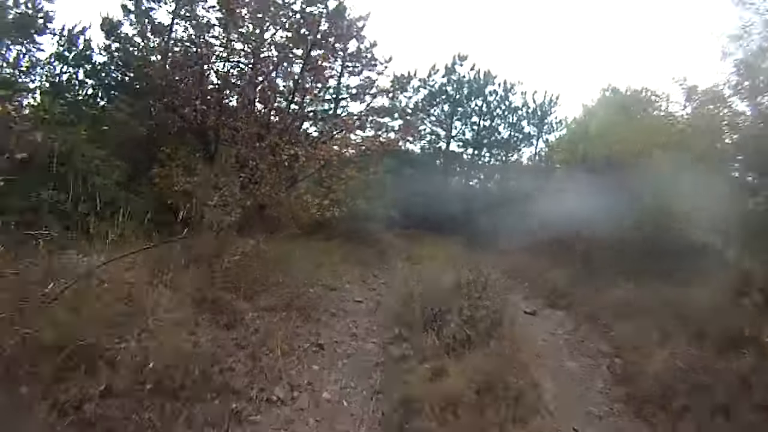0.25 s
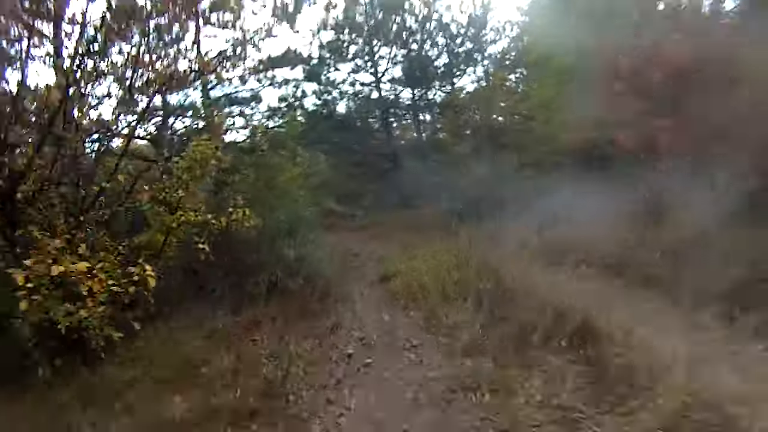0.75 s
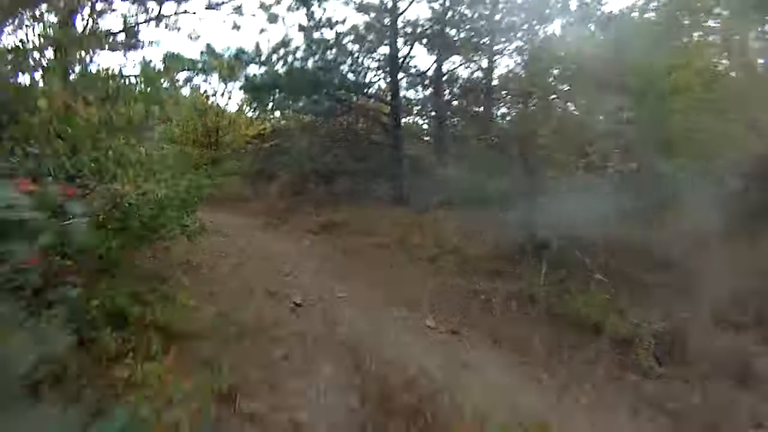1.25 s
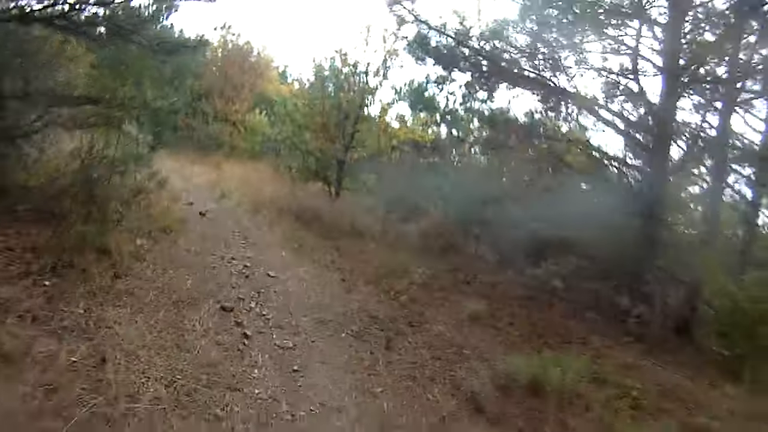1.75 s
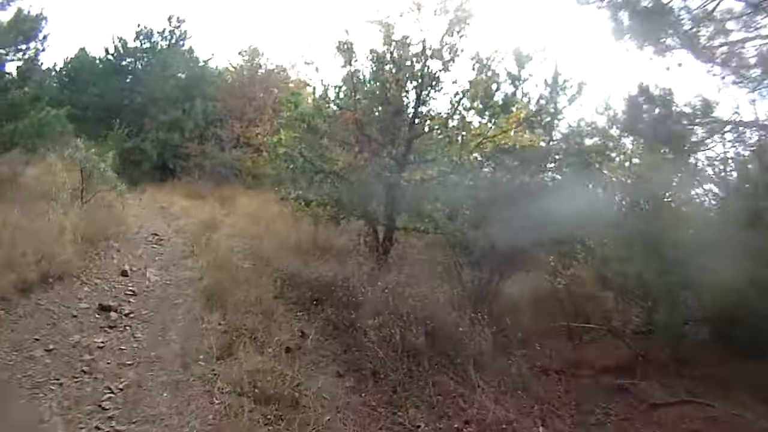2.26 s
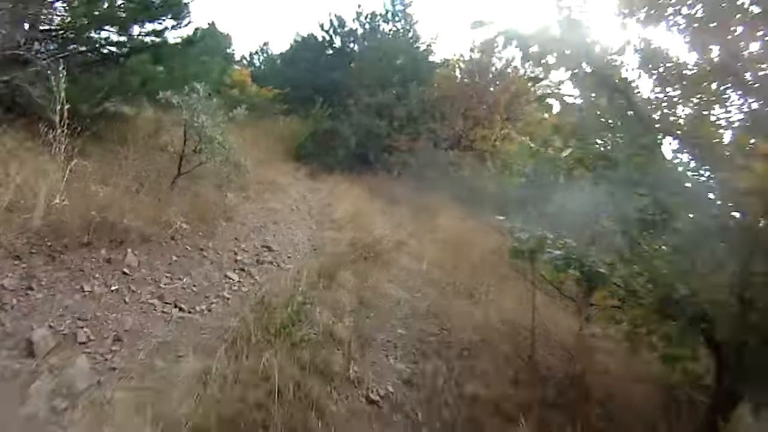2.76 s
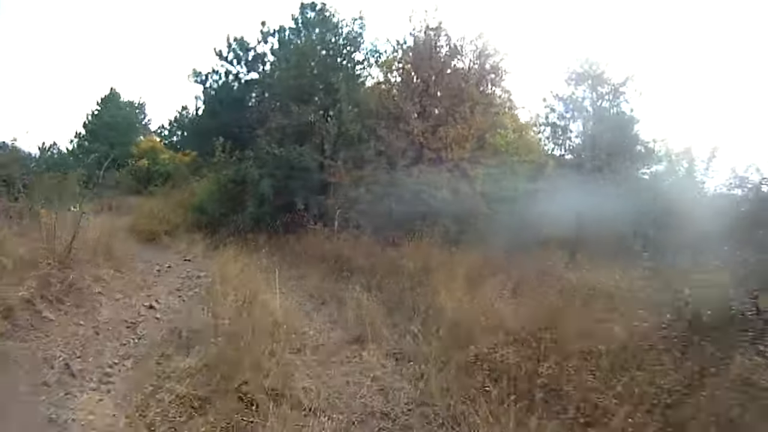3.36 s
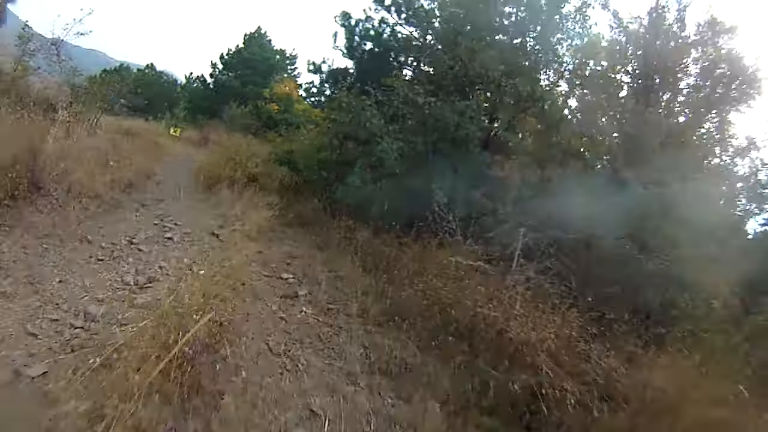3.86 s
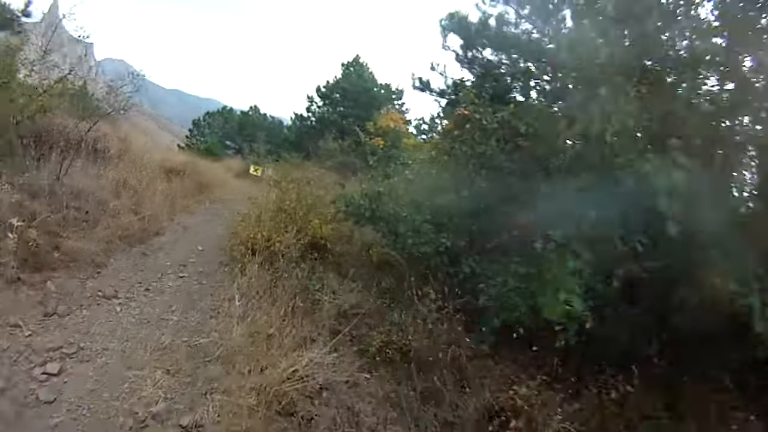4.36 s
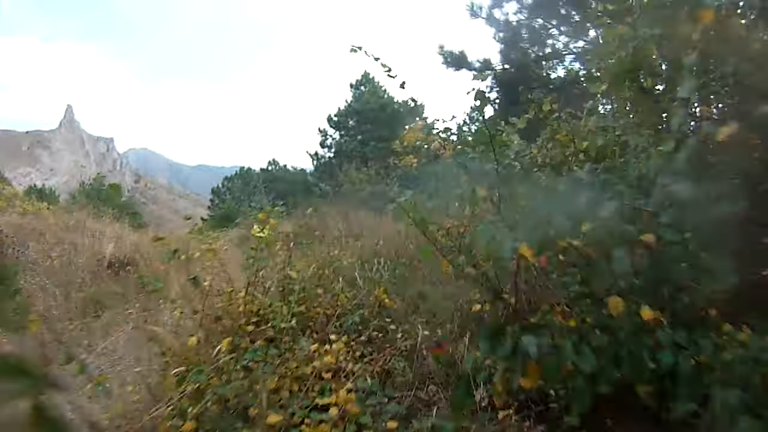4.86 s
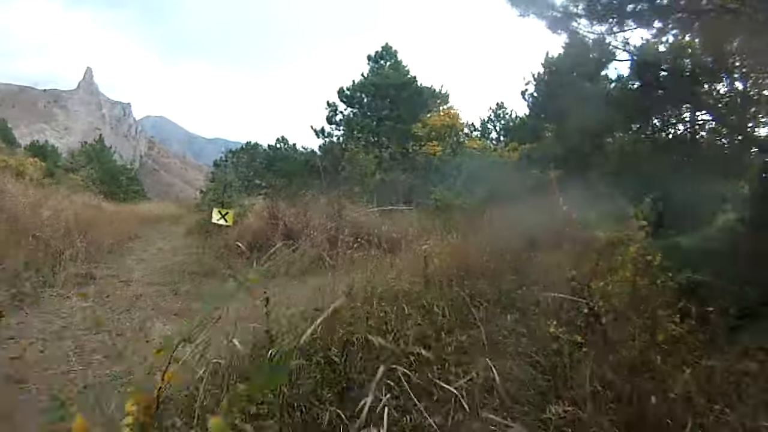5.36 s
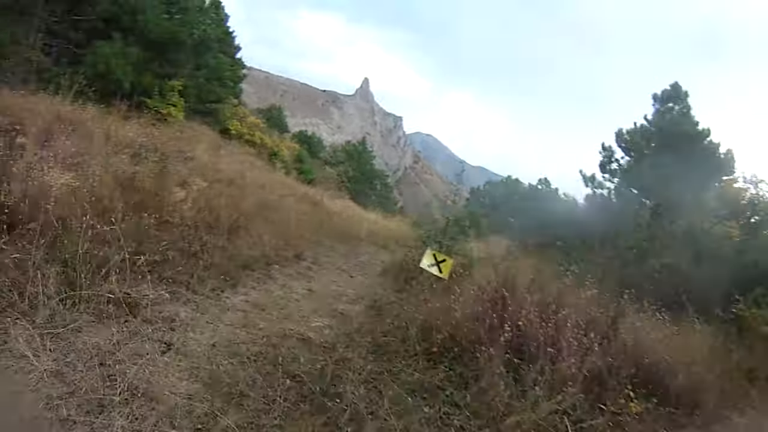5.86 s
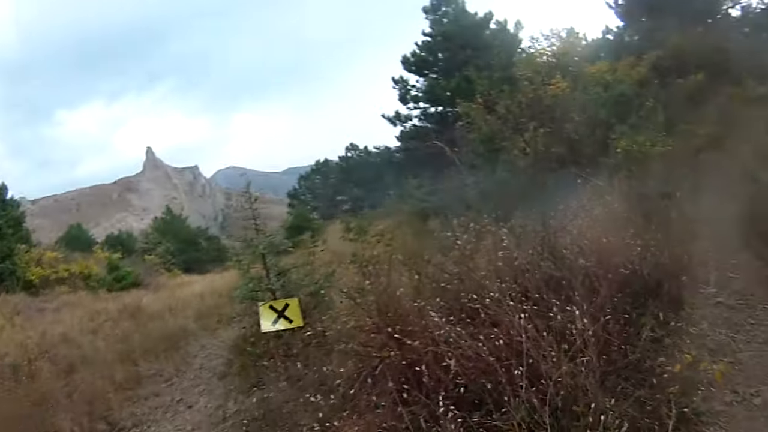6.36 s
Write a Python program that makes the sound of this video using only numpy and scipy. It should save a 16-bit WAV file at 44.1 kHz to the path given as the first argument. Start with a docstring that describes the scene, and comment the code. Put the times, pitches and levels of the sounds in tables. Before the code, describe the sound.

Bicycle disc brakes honk and shriek in rough, stuttering pulls while tyres rumble and crunch over a rocky trail, with rattling and wind.

```python
"""A mountain bike rolls down a rocky trail, heard from an action camera in a closed case on the bike.
From the start tyres rumble, wind buffets the case, gravel crunches and stones make the mount rattle.
At 1.3, 3.6 and 4.4 s the disc brake is pulled: stick-slip of the pads gives a rough horn-like honk.
In short bursts a rotor mode locks on, shrieks on harmonic 6, feeds the octave and drags the pitch down.
The rattle thins as the bike slows; from 6 s the pads rub dry as the brake is let go."""
import sys
import numpy as np
from scipy import signal
from scipy.fft import rfft, irfft
from scipy.io import wavfile
from scipy.ndimage import uniform_filter1d

SR = 44100
rng = np.random.default_rng(int(sys.argv[2]) if len(sys.argv) > 2 else 0)


def master(y):
    """Save y as 16-bit WAV."""
    cut = np.clip(np.atleast_2d(y).T, -1, 1)
    pcm = np.round(cut * 32767)  # scale
    wavfile.write(sys.argv[1], SR, pcm.astype(np.int16))


N = 291501
T = np.arange(N) / SR

# tyre rumble, following ground roughness: t/s, level/dB
RUMBLE_LEVEL = [(0.0, -20), (0.02, -19), (1.25, -19.5), (1.49, -26), (1.54, -20), (1.78, -35),
                (1.86, -29.5), (2.34, -38), (2.43, -27.5), (2.49, -44), (2.59, -29.5), (2.82, -19),
                (3.44, -22), (3.48, -15.5), (3.52, -32), (3.66, -18), (3.7, -38), (3.81, -18.5),
                (3.98, -34.5), (4.08, -29), (4.12, -43), (4.4, -20), (4.57, -29.5), (4.79, -24),
                (4.92, -39), (4.97, -24), (5.12, -36.5), (5.69, -39.5), (6.04, -47.5), (6.11, -41),
                (6.5, -26), (6.61, -42)]
# gravel crunch: t/s, level/dB
GRAVEL_LEVEL = [(0, -32), (.25, -39), (.6, -33.5), (.7, -21.5), (.85, -22.5), (.95, -38), (1.1, -25.5),
                (1.25, -28), (1.6, -25.5), (2.6, -31), (2.85, -35), (3.25, -25.5), (3.45, -33.5),
                (3.51, -45), (3.62, -24.5), (4.3, -32.5), (5.0, -27.5), (5.9, -34), (6.61, -44)]
# case resonances: f/Hz, width/Hz, gain/dB
CASE_MODES = [(257, 62, 5.5), (724, 61, 6), (1000, 95, -2.5), (1755, 148, -2.5), (2567, 230, -4),
              (2847, 210, 0.5), (3540, 375, 2), (3908, 435, -1.5), (5200, 750, -6.5)]
# steady honk over the three pulls: t/s, fundamental/dB, octave/dB
HONK_LEVEL = [(1.32, -58.5, -65), (1.337, -22, -17.5), (1.4, -22, -26.5), (1.47, -23, -19), (1.5, -33, -34),
              (1.53, -25, -18.5), (1.73, -23, -26.5), (1.85, -20.5, -21), (2.1, -22, -27.5),
              (2.28, -25.5, -19), (2.365, -22.5, -30), (2.545, -25.5, -28.5), (2.58, -33, -50),
              (3.6, -44, -39), (3.65, -20.5, -29), (3.79, -24, -25), (3.85, -23, -44), (3.88, -28, -23),
              (4.02, -20.5, -20), (4.15, -31, -20), (4.2, -27.5, -40), (4.37, -24, -39), (4.41, -19.5, -18),
              (4.7, -23, -25.5), (4.85, -31, -29.5), (4.95, -21.5, -23), (5.17, -25, -30),
              (5.27, -23, -17.5), (5.46, -22.5, -26.5), (5.78, -21, -23.5), (6.06, -31.5, -35.5),
              (6.23, -17, -29.5), (6.26, -24, -20), (6.33, -21.5, -20), (6.37, -22, -33), (6.6, -35, -44)]


def undb(db):
    """Decibels to gain."""
    return 10 ** (np.asarray(db) / 20)


def unit(x):
    """Scale to rms 1."""
    return x / np.sqrt(np.mean(x ** 2))


def running_unit(x, samples=2646):
    """Scale to running rms 1."""
    return x / np.sqrt(uniform_filter1d(x ** 2, size=samples))


def curves(rows):
    """Each column after t/s, interpolated over T."""
    times_s, *columns = np.transpose(rows)
    return [np.interp(T, times_s, column) for column in columns]


def noise(colour):
    """Noise of rms 1; colour rows: f/Hz, level/dB."""
    hz, db = np.transpose(colour)
    bins_hz = np.maximum(np.fft.rfftfreq(N, 1 / SR), 1)
    gain_db = np.interp(np.log(bins_hz), np.log(hz), db, left=-90, right=-90)
    return unit(irfft(rfft(rng.standard_normal(N)) * undb(gain_db), N))


def wander(hz):
    """Noise of rms 1, low-passed at hz."""
    return unit(signal.sosfilt(signal.butter(2, hz, fs=SR, output="sos"), rng.standard_normal(N)))


def ring(x, modes):
    """Resonators summed in alternating sign; modes: f/Hz, width/Hz, gain/dB."""
    return sum((-1) ** k * undb(db) * signal.lfilter(*signal.iirpeak(hz, hz / width_hz, fs=SR), x)
               for k, (hz, width_hz, db) in enumerate(modes))


def blows(rows):
    """One damped sine per impact; rows: t/s, level/dB, f/Hz, width/Hz."""
    out = np.zeros(N)
    for start_s, db, hz, width_hz in rows:
        age_s = np.maximum(T - start_s, 0)
        decay = np.exp(-np.minimum(np.pi * width_hz * age_s, 20))
        out += undb(db) * decay * np.sin(2 * np.pi * hz * age_s)
    return out


def bursts(rows, rise_s, fall_s):
    """Trapezoid gains, one track per level column; rows: t/s, length/s, level/dB, ..."""
    gains = np.zeros((len(rows[0]) - 2, N))
    for start_s, length_s, *levels_db in rows:
        span = slice(int(start_s * SR), int((start_s + length_s + fall_s) * SR))
        age_s = T[span] - start_s
        shape = np.clip(np.minimum(age_s / rise_s, 1 + (length_s - age_s) / fall_s), 0, 1)
        gains[:, span] = np.maximum(gains[:, span], np.outer(undb(levels_db), shape))
    return gains


def wind(gusts_db=2):
    """Air buffets the case, dying down as the bike slows."""
    # wind over tyre rumble: t/s, level/dB
    level = [(0, 0.5), (1.2, -2.5), (1.6, -5.5), (2.4, 3), (2.75, -3.5), (3.0, -1), (3.45, 0.5), (3.75, -6),
             (5.5, -2.5), (6.1, -3), (6.35, -21.5), (6.61, -10)]
    # buffeting spectrum: f/Hz, level/dB
    colour = [(12, -5), (30, -10), (55, 0.5), (80, -5.5), (125, -7.5), (180, -8.5), (280, -47), (600, -56)]
    (rumble_db,), (relative_db,) = curves(RUMBLE_LEVEL), curves(level)
    return unit(noise(colour) * undb(gusts_db * wander(54))) * undb(rumble_db + relative_db)


def tyres(lumps_db=3.5):
    """Tyres rumble over uneven ground."""
    # rumble spectrum: f/Hz, level/dB
    colour = [(40, -40), (110, -21), (165, 1.5), (250, -1), (350, -2), (440, -9), (530, -19.5), (700, -7),
              (950, -18.5), (1250, -23), (2000, -24), (4000, -29.5), (6000, -59)]
    rumble_db, = curves(RUMBLE_LEVEL)
    return unit(noise(colour) * undb(lumps_db * wander(47))) * undb(rumble_db + 0.5)


def gravel(grains_per_s=1500, spread_db=12.0, grit_db=-8, hiss_db=-16):
    """Dense small impacts over a hiss of dirt, heard mostly through the case modes."""
    grains = (rng.random(N) < grains_per_s / SR) * rng.standard_normal(N)
    grains *= undb(spread_db * np.minimum(rng.exponential(size=N), 3))
    crunch = unit(grains) + undb(hiss_db) * rng.standard_normal(N)
    grit = signal.sosfilt(signal.butter(2, [1200, 5200], "band", fs=SR, output="sos"), crunch)
    level_db, = curves(GRAVEL_LEVEL)
    return undb(level_db) * unit(ring(crunch, CASE_MODES[1:]) + undb(grit_db) * grit)


def stones():
    """The wheels flick small stones and twigs."""
    # ticks: t/s, level/dB, f/Hz, width/Hz
    ticks = [(0.1838, -4, 1700, 500), (0.664, -11, 5040, 300), (.7462, -8, 4900, 300),
             (0.791, -11, 4700, 300), (.8115, -13, 5200, 300), (0.835, -7, 4940, 300),
             (0.861, -10.5, 5060, 253.3), (6.5125, -12, 5640, 160)]
    return blows(ticks)


def jolts():
    """The wheels drop over rocks."""
    # thuds: t/s, level/dB, f/Hz, width/Hz
    thuds = [(1.186, -6, 236, 45), (2.699, -2.5, 204, 109), (3.291, -5.5, 150, 82), (3.479, 4, 176, 101)]
    return blows(thuds)


def jiggles(count=280, base_db=-26, spread_db=5.5, rocky_db=-24, db_per_db=1.75):
    """Light, uneven knocks that fade on smooth ground; returns rows t/s, level/dB."""
    times_s = (np.arange(count) + rng.random(count)) * T[-1] / count
    ground_db = sum(np.interp(times_s, *np.transpose(rows)) for rows in (RUMBLE_LEVEL, GRAVEL_LEVEL)) / 2
    fade_db = db_per_db * np.minimum(ground_db - rocky_db, 0)
    scatter_db = spread_db * np.clip(rng.standard_normal(count), -2, 1.5)
    return list(zip(times_s, base_db + fade_db + scatter_db))


def rattle(boost_db=3.0, graze=0.014, graze_s=0.0005, chatter=0.12, chatter_s=0.002, detune=0.026):
    """The mount grazes, hits and chatters on the case, which rings a little differently each time."""
    # hardest knocks: t/s, relative level/dB
    hard_knocks = [(0.0815, -13), (0.0897, -6.5), (0.1091, -11.5), (0.2767, -7), (0.3539, -10.5),
                   (0.3626, -9), (0.4528, -14), (0.4588, -13), (0.4854, -15), (0.4981, -12.5), (0.557, -16),
                   (0.5684, -12), (0.579, -13), (0.652, -9), (0.6713, -10), (0.7807, -13.5), (0.8457, -15),
                   (0.8851, -10.5), (0.894, -14), (0.915, -12.5), (0.94, -16), (0.9786, -8), (1.0034, -16),
                   (1.0354, -12), (1.1176, -13.5), (1.14, -11), (1.1896, -7.5), (1.254, -11.5),
                   (1.2825, -17.5), (1.3443, -14), (1.5382, -18), (1.6092, -8), (2.5853, -19.5),
                   (2.594, -16.5), (2.616, -19.5), (2.662, -14), (2.7752, -11.5), (2.79, -14.5),
                   (2.7965, -9), (2.8214, -12), (2.8422, -13.5), (2.897, -10), (2.9846, -10),
                   (2.9935, -13.5), (3.0467, -14), (3.0582, -17), (3.064, -13), (3.095, -11.5),
                   (3.1412, -11.5), (3.165, -13.5), (3.1832, -12.5), (3.203, -15), (3.244, -10.5),
                   (3.328, -12.5), (3.3475, -13.5), (3.4156, -13), (3.473, -14.5), (3.4789, -10),
                   (3.7831, -14), (3.8014, -14), (3.871, -12), (4.3239, -14), (4.3745, -15.5),
                   (4.4902, -11.5), (4.6711, -13.5), (4.6982, -14.5), (4.7159, -14.5), (4.775, -16),
                   (5.154, -18)]
    lead, size = 256, 2048  # samples
    out, t = np.zeros(N + size), T[:size] - T[lead]
    scuff = np.where(t < 0, graze * np.exp(-abs(t) / graze_s), chatter * np.exp(-abs(t) / chatter_s))
    for hit_s, db in hard_knocks + jiggles():
        contact = (t == 0) + scuff * rng.standard_normal(size)
        modes = [(hz * (1 + detune * rng.standard_normal()), *rest) for hz, *rest in CASE_MODES]
        knock = ring(contact, modes) * rng.choice([-1, 1])
        knock /= np.std(knock[lead:lead + 88])  # first 2 ms after the hit
        start = max(int(hit_s * SR) - lead, 0)
        out[start:start + size] += undb(db + boost_db) * knock
    return out[:N]


def pad_rub(flutter_db=1.1):
    """The pads rub dry as the brake is let go."""
    # rubbing: t/s, level/dB
    level = [(6.05, -39), (6.2, -34.5), (6.35, -27), (6.5, -26), (6.56, -29.5), (6.61, -40)]
    # rubbing spectrum: f/Hz, level/dB
    colour = [(530, -41), (900, -23), (1060, 3), (1360, -16), (1680, 2.5), (2120, -13), (2770, 0.5),
              (3080, -10), (3390, -7), (4150, -7), (4890, -40), (5450, -17), (5800, -39), (7540, -18),
              (12800, -120)]
    level_db, = curves(level)
    return (T > level[0][0]) * undb(level_db + flutter_db * wander(72.0)) * noise(colour)


def stutter(rough, rate_hz=71.5, depth_db=6, uneven=0.284):
    """Under a rough bite the rotor mode builds and breaks off: a fast throb of steady mean power."""
    beat = np.cos(2 * np.pi * np.cumsum(rate_hz * (1 + uneven * wander(28))) / SR)
    return running_unit(undb(depth_db * rough * beat))


def brake_controls(full_lock_db=-14.5, sag_hz=5.4, steadying=0.24, drain_db=1):
    """Pitch, roughness, dB of harmonics 1, 2, 4, 6. Rotor lock cuts the first three, lifts the rest."""
    # stick-slip of the pads: t/s, f/Hz, roughness
    stick_slip = [(1.3, 785, 0.37), (1.38, 769.3, 0.84), (1.95, 762.6, 1.11), (2.15, 774.5, 0.96),
                  (2.26, 756.5, 0.79), (2.44, 764.5, 0.66), (2.55, 757, 0.53), (3.62, 790, 0.76),
                  (3.7, 772, 0.5), (3.86, 772, 0.76), (3.98, 758, 0.68), (4.08, 764, 0.68),
                  (4.17, 748, 0.63), (4.4, 765.5, .95), (4.85, 766.6, 0.89), (4.97, 780, .75),
                  (5.08, 763.6, 0.49), (5.28, 768.5, 0.22), (5.45, 753, 0.32), (5.58, 769.7, 0.48),
                  (5.85, 766.7, 0.25), (6.05, 757.5, 0.15), (6.2, 787, 0.52), (6.32, 791, 0.21),
                  (6.4, 781, .94), (6.6, 738, 1.23)]
    # the pads grab and the fundamental blares: t/s, length/s, level/dB
    grabs = [(1.325, 0.066, -13.5), (1.43, 0.055, -21), (1.53, 0.043, -20), (1.603, 0.053, -14.5),
             (2.14, 0.093, -18), (3.645, 0.04, -12.5), (3.74, 0.075, -17), (4.755, 0.058, -13),
             (5.0, 0.048, -18), (5.487, 0.055, -16.5), (5.565, .042, -16.5), (5.655, 0.013, -14.5),
             (6.105, 0.11, -15.5), (6.22, 0.082, -17.5)]
    # the rotor mode locks on: t/s, length/s, sixth/dB, fourth/dB, octave/dB
    locks = [(1.426, 0.051, -21, -34, -16), (1.604, .033, -19, -26, -16), (1.664, 0.058, -17, -19.5, -15.5),
             (1.761, .12, -20.5, -28, -21.5), (1.903, .05, -16, -29, -17.5),
             (1.974, 0.065, -16.5, -22.5, -18.5), (2.202, 0.13, -17, -32, -22.5),
             (2.38, 0.02, -22, -31, -22), (2.421, .016, -16, -25, -12.5),
             (2.447, 0.083, -16.5, -24.5, -19.5), (3.671, .034, -15.5, -25.5, -18.5),
             (3.873, 0.051, -13.5, -24, -16), (3.948, 0.13, -17.5, -29.5, -23),
             (4.095, .024, -13, -24, -25), (4.136, 0.035, -17.5, -35, -26),
             (4.41, 0.023, -18.5, -21.5, -15), (4.452, 0.042, -23.5, -35, -20),
             (4.507, 0.025, -13, -26, -19), (4.596, 0.051, -19.5, -27, -19.5),
             (4.812, 0.019, -14, -20, -17), (4.847, .018, -15.5, -29.5, -16), (4.91, 0.015, -23, -30, -23),
             (5.0, 0.025, -17.5, -34.5, -16.5), (5.04, .025, -11.5, -42, -17),
             (5.063, 0.05, -16.5, -33, -20.5), (5.143, 0.0087, -13, -28, -22),
             (5.203, 0.014, -17, -25, -14.5), (5.238, 0.13, -14, -21.5, -21), (5.362, 0.076, -19, -30, -41),
             (5.445, 0.049, -29.5, -34, -39), (5.5, 0.093, -16.5, -42, -21.5),
             (5.607, 0.042, -15.5, -18, -18), (5.663, 0.03, -12.5, -26, -15.5),
             (5.702, 0.073, -15.5, -26, -28), (5.775, 0.072, -20, -35.5, -31),
             (5.849, 0.041, -13, -30.5, -19.5), (5.894, 0.1686, -22.5, -42, -24),
             (5.942, 0.023, -12, -28, -18.5), (6.003, 0.037, -16.5, -27.5, -22.5),
             (6.16, 0.027, -27, -26, -27), (6.252, 0.03, -28, -25, -20)]

    def lifted(own_db, fed):
        """Power sum of a level and a gain, in dB."""
        return 20 * np.log10(np.hypot(undb(own_db), fed))

    hz, rough = curves(stick_slip)
    first_db, second_db = curves(HONK_LEVEL)
    blare, = bursts(grabs, rise_s=0.014, fall_s=0.022)
    sixth, fourth, second = bursts(locks, rise_s=0.0048, fall_s=0.00864)
    lock = np.minimum(sixth / undb(full_lock_db), 1)
    return (hz - sag_hz * lock,
            rough * (1 - steadying * lock),
            lifted(first_db, blare) - drain_db * lock,
            lifted(second_db, second),
            lifted(second_db - 10, fourth),
            lifted(second_db - 15, sixth))


def brake_squeal(jitter=0.01933, drift_db=5.0, looseness=0.43):
    """Stick-slip harmonics stumble as the rotor drags through the pads."""
    hz, rough, first_db, second_db, fourth_db, sixth_db = brake_controls()
    phase = 2 * np.pi * np.cumsum(hz * (1 + jitter * rough ** 2 * wander(119.5))) / SR
    bite = wander(73.5)  # pad pressure, common to all harmonics
    pad_lag, rotor_lag = 0.82 * rough, 2.24 * rough + 0.98  # rad rms

    def judder(depth=3.0):
        """Friction caps the vibration: it holds near the top and drops when the grip fails."""
        grip = 1.33 * bite + 2.67 * wander(45.6)
        return running_unit(undb(-depth * (0.27 + rough) * np.logaddexp(0, -2 * grip) / 2))

    def harmonic(order, lag):
        """Partial of rms 1 with unsteady phase."""
        return -np.sqrt(2) * np.cos(order * phase + lag * wander(35.3))

    def overtone(order, lag, db):
        """Weak partial that comes and goes."""
        return undb(db + drift_db * np.tanh(wander(18.0))) * judder() * harmonic(order, lag)

    honk = sum(undb(db) * judder() * harmonic(order, pad_lag)
               for order, db in [(1, first_db), (2, second_db), (4, fourth_db)])
    # under a rough bite the rotor mode slips out of step and rasps
    free_share = np.clip(looseness * rough ** 2, 0, 1)
    rasp = unit(ring(rng.standard_normal(N), [(4650, 300, 0)]))
    shriek = undb(sixth_db) * stutter(rough) * judder(depth=4)
    shriek *= np.sqrt(1 - free_share) * harmonic(6, rotor_lag) + np.sqrt(free_share) * rasp
    # the honk mixes with the rotor modes
    mixed = (overtone(3, pad_lag, 0.7 * (first_db + second_db) - 6.5)
             + overtone(5, pad_lag, (second_db + fourth_db) / 2 - 10.5)
             + overtone(7, rotor_lag, sixth_db + first_db / 2 - 7.5)
             + overtone(8, rotor_lag, sixth_db + second_db / 2 - 8.0))
    # each slip scrapes and rings the case
    grit = rng.standard_normal(N) * (1 + np.cos(phase)) * undb(9.4 * rough * bite)
    scrape = running_unit(ring(grit, CASE_MODES[1:]), samples=4410)
    scrape *= rough * undb(0.6 * second_db + 0.35 * sixth_db - 5)
    return (T > HONK_LEVEL[0][0]) * (undb(-0.26) * honk + shriek + mixed + scrape)


def scene():
    """All sources close to one microphone."""
    return (brake_squeal() + pad_rub() + tyres() + wind() + gravel() + rattle() + stones() + jolts())[None]


def record(dry, rate_hz=12000, top_hz=15400):
    """The camera samples at a low rate and overloads; sample-and-hold mirrors sound into the treble."""
    coarse = signal.resample_poly(dry, rate_hz, SR, axis=1, window=("kaiser", 4))
    held = np.repeat(np.clip(coarse, -1, 1), 4, axis=1)
    mirrored = signal.resample_poly(held, SR, 4 * rate_hz, axis=1)[:, :N]
    return signal.sosfilt(signal.ellip(8, .2, 70, top_hz, fs=SR, output="sos"), mirrored)


dry = scene()
out = record(dry)
master(out)
```